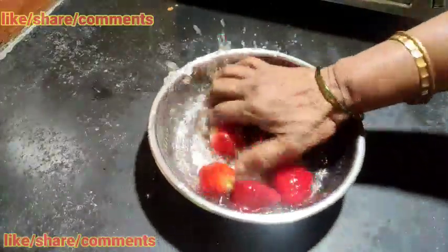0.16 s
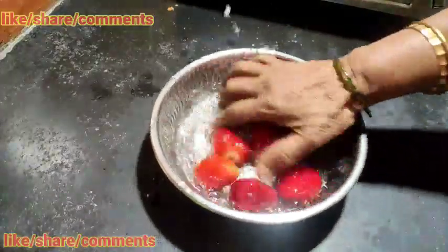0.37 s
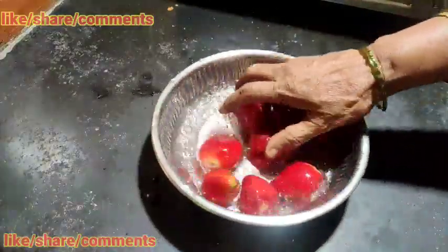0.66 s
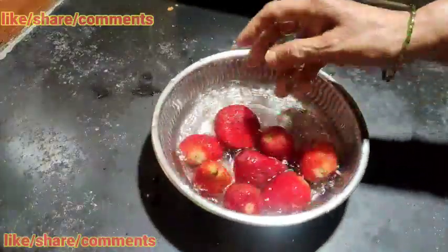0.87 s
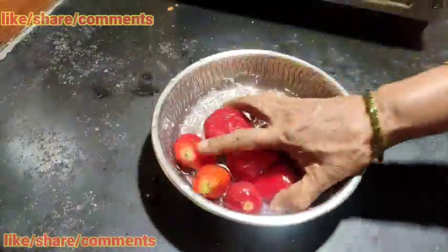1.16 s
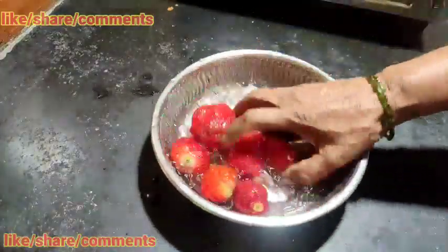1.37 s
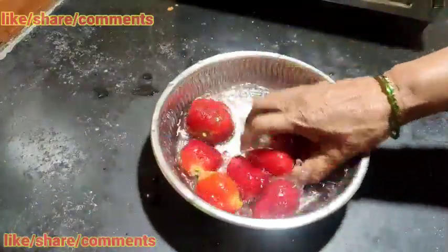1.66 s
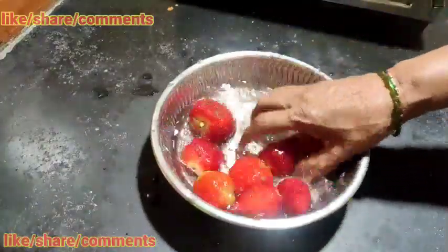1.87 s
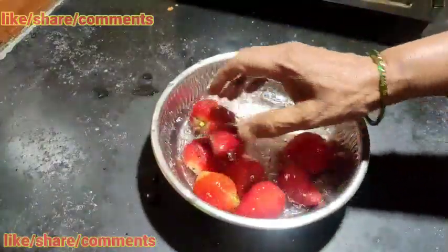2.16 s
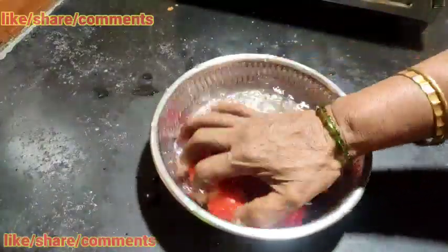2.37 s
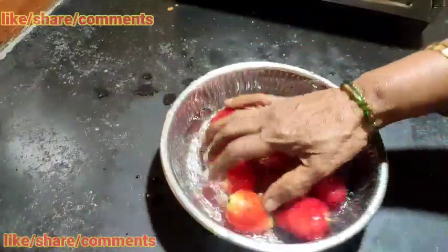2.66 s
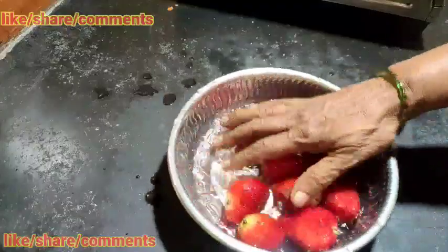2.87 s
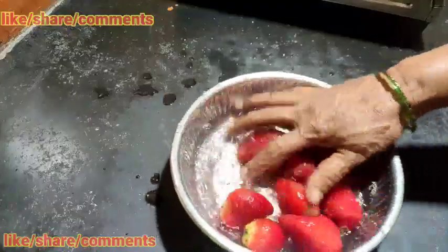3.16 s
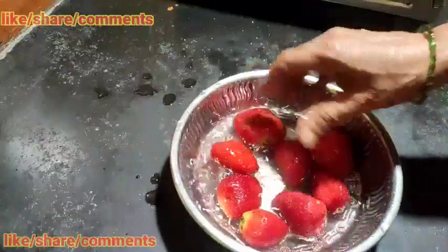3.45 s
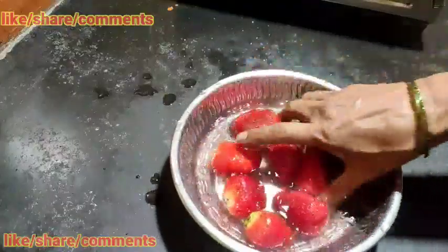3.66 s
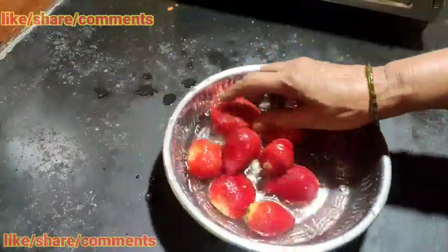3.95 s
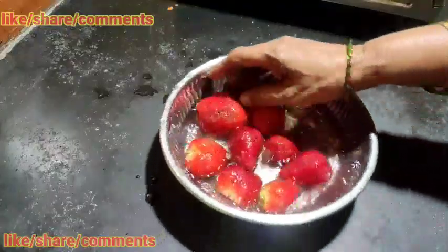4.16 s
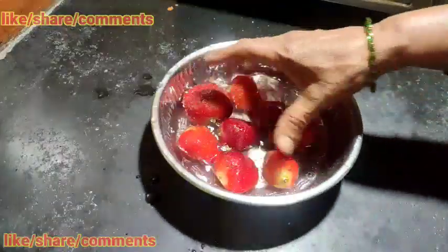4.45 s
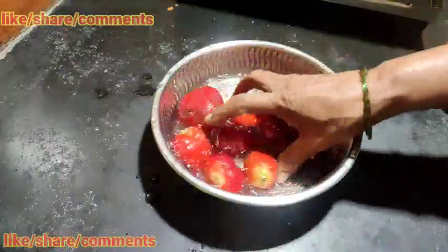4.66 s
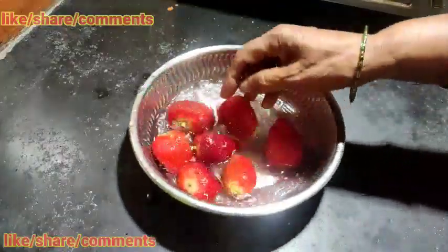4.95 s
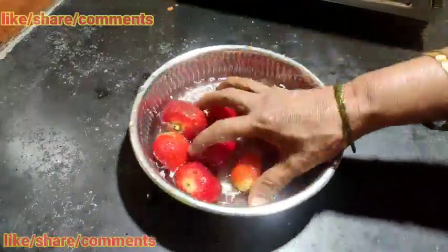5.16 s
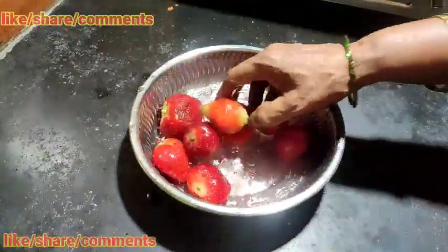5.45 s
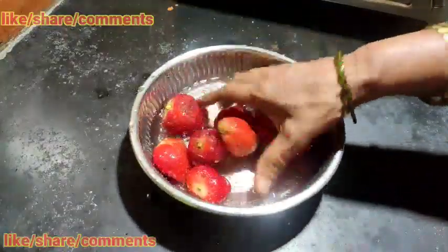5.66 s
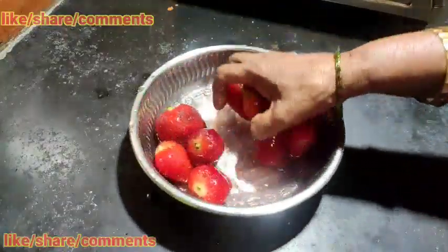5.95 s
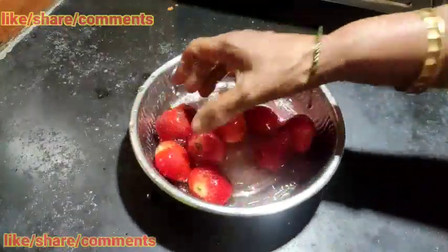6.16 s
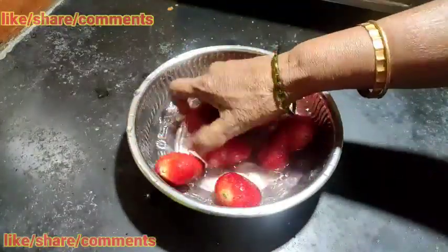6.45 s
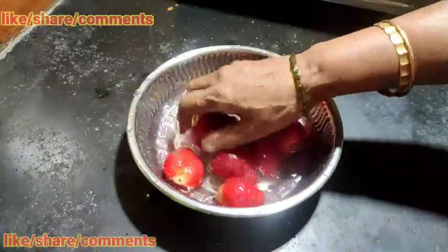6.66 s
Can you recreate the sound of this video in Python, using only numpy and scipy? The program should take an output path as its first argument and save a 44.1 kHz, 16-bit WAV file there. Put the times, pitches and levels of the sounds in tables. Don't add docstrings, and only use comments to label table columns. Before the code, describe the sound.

Fruit is stirred by hand in a thin steel bowl of water. Vigorous sloshing, bubbly plops and sharp metallic knocks come first, then a single rim ring that bends upward. Scrapes on stone, bounces, droplet ticks and tiny glass bangle clinks follow in uneven strokes, thinning toward the end. Close phone pickup from above, small reverberant kitchen, low street rumble behind.

```python
import sys
import numpy as np
from scipy import signal
from scipy.fft import rfft, irfft, next_fast_len
from scipy.io import wavfile
from scipy.ndimage import uniform_filter1d

SR = 44100
rng = np.random.default_rng(int(sys.argv[2]) if len(sys.argv) > 2 else 0)


def log_audio(samples):
    frames = np.atleast_2d(samples).T
    limited = np.clip(frames, -1, 1)
    pcm = np.round(limited * 32767).astype(np.int16)
    wavfile.write(sys.argv[1], SR, pcm)


def makeup_ratio(level_db):
    decades = np.asarray(level_db, float) / 20
    return 10 ** decades


N = 300143
TIME = np.arange(N) / SR
SIDE = np.array([[1], [-1]])


def level(x, db):
    return x * makeup_ratio(db) / np.sqrt(np.mean(x ** 2))


def colour(x, points):
    hz, db = np.transpose(points)
    size = next_fast_len(x.shape[-1])
    f = np.fft.rfftfreq(size, 1 / SR) + 1
    gain = makeup_ratio(np.interp(np.log(f), np.log(hz), db))
    return irfft(rfft(x, size) * gain, size)[..., :x.shape[-1]]


def band(x, hz, width):
    edges = np.clip([hz * 2 ** (-width / 2), hz * 2 ** (width / 2)], 10, .45 * SR)
    return signal.sosfilt(signal.butter(2, edges, "bandpass", fs=SR, output="sos"), x)


def ring(x, hz, t60):
    r, w = np.exp(-np.log(1000) / (t60 * SR)), 2 * np.pi * hz / SR
    return signal.lfilter([0, r * np.sin(w)], [1, -2 * r * np.cos(w), r * r], x)


def ports(alike, size=N):
    mid, side = rng.standard_normal((2, size))
    alike = np.clip(alike, 0, 1)
    return np.sqrt((1 + alike) / 2) * mid + np.sqrt((1 - alike) / 2) * side * SIDE


def walk(rate):
    k = int(SR / rate)
    steps = np.repeat(rng.standard_normal(N // k + 1), k)[:N]
    return level(uniform_filter1d(steps, k), 0)


def add(out, s, x):
    i = int(s * SR)
    out[:, i:i + x.shape[-1]] += x[..., :max(N - i, 0)]


def bubble(hz, cycles, rise):
    turns = np.arange(int(2 * cycles / hz * SR) + 8) * hz / SR
    tone = np.sin(2 * np.pi * turns * (1 + rise * turns / cycles / 2))
    return tone * np.exp(-3 * turns / cycles) * (1 - np.exp(-2 * turns))


# frequency in Hz, density in dB per Hz.
STREET_SPECTRUM = [(12, -18.5), (20, 9), (40, -5.5), (116, -4), (270, -10), (328, -11), (590, -20),
                   (923, -18.5), (1030, -40.5), (2140, -25.5), (4180, -33.5), (5530, -33), (10500, -45),
                   (14300, -34.5), (16000, -52)]
# frequency in Hz, width in octaves, level in dB.
TRAFFIC_DRONES = [(27, 0.58, -52.5), (73, 0.31, -55.5), (140, 0.27, -60.5)]
# middle in seconds,
# centre frequency in Hz, level in dB.
LOW_SWELLS = [(.2, 140, -44), (1.4, 73, -43.5), (1.846, 75.4, -43.5), (4.05, 142.5, -52),
              (2.85, 140, -53), (2.75, 27, -46.5), (3.405, 28.4, -43), (3.998, 29, -46.5),
              (0.249, 293, -54.5), (4.302, 63.7, -51), (4.749, 129.4, -49), (5.4, 72.8, -46),
              (5.448, 140, -53), (5.698, 27.2, -60.5), (5.98, 69.3, -50), (5.998, 131, -57),
              (6.598, 105.4, -54)]


def street():
    alike, apart = rng.standard_normal(N), ports(0.053)
    floor = colour(alike, [(200, -3.0), (1500, -18)]) + colour(apart, [(100, -22.5), (1500, -5.5)])
    out = level(colour(floor, STREET_SPECTRUM), -50.0) * makeup_ratio(1.2 * walk(4))
    for hz, width, db in TRAFFIC_DRONES:
        out = out + level(band(ports(0.88), hz, width), db)
    pass_s = 0.24
    for s, hz, db in LOW_SWELLS:
        rumble = level(band(ports(1.0, size=2 * SR), hz, 0.33), db)
        swell = np.exp(-((TIME[:2 * SR] - min(s, 1)) / pass_s) ** 2)
        add(out, max(s - 1, 0), rumble * swell)
    return out


# start in seconds, hold in seconds, sliding on stone in dB,
# stirring of the water in dB.
STROKES = [(0.0, 0.019, -32, -45), (0.123, 0.17, -39, -42), (0.268, 0.14, -41, -40), (.5, 0.25, -48, -52.5),
           (0.75, 0.0089, -57, -46), (1.167, 0.13, -45, -54.5), (1.36, 0.18, -56, -57.5),
           (1.59, 0.24, -47, -53), (1.976, 0.06, -45, -43), (2.14, 0.048, -55.5, -55),
           (2.37, 0.12, -44.5, -67.5), (2.552, 0.19, -46.5, -49.5), (2.83, 0.038, -35.5, -46.5),
           (2.966, 0.058, -42, -51.5), (3.154, 0.026, -41, -57), (3.785, 0.042, -46.5, -55.5),
           (4.158, 0.17, -40.5, -62), (4.623, 0.06, -52, -56), (4.82, 0.027, -36.5, -69),
           (5.154, 0.04, -53.5, -71), (5.267, 0.074, -42, -51.5), (5.758, 0.11, -70, -57.5),
           (6.2, 0.044, -54.5, -57), (6.31, 0.098, -46, -57), (6.5, 0.34, -60.5, -62.5)]


def hand(column, rise_s, fall_s):
    t = TIME[::64]
    rest_db = -65.5
    out = np.full(len(t), rest_db)
    for row in STROKES:
        early, late = (row[0] - t) / rise_s, (t - row[0] - row[1]) / fall_s
        out = np.maximum(out, row[column] - 10 * np.clip(np.maximum(early, late), 0, None))
    return np.interp(TIME, t, out)


def stir_db():
    return hand(column=3, rise_s=0.11, fall_s=0.079)


# frequency in Hz, density in dB per Hz.
SLIDE_SPECTRUM = [(290, -43.5), (500, -16.5), (888, -7.5), (1330, -15.5), (2200, -4), (3680, -8),
                  (5830, -0.5), (10800, -1.5), (15500, -6)]
BOWL_HZ = [930, 1590, 1770, 1960, 2170, 3010, 3780, 3930, 4680, 4800, 5450, 5680, 6600, 7755, 8420, 9030,
           10420, 11700, 12900]
# level in dB, T60 in seconds, lasting ring in dB.
BOWL_MODES = [(-20.5, 0.071, -31.5), (-21.5, 0.24, -32.5), (-16.5, 0.1, -28.5), (-15, 0.078, -28.5),
              (-21.5, 0.22, -32), (-12, 0.12, -22.5), (-13.5, 0.13, -15.5), (-6, 0.051, -18.5),
              (-10.5, 0.18, -18.5), (-7.5, 0.055, -19.5), (3, 0.035, -35), (-5.5, 0.09, -23.5),
              (-17, 0.031, -38), (1.5, 0.052, -21.5), (3, 0.015, -36), (1.5, 0.027, -28.5),
              (7.5, 0.019, -31.5), (-20.5, 0.036, -30), (-15, 0.071, -24)]


def sliding():
    crackle = makeup_ratio(-3.8 * np.log(rng.random(N) + 1e-4)) * (rng.random(N) < .03)
    rough = np.clip((stir_db() + 64) / 12, .2, 1)
    grit = ports(.1) * makeup_ratio(3.5 * rough * walk(45))
    grit = grit * (1 + 2.5 * rough * uniform_filter1d(crackle, size=13))
    modes = sum(makeup_ratio(db) * ring(grit, hz, 0.092) for hz, (db, *_) in zip(BOWL_HZ, BOWL_MODES))
    scrape = level(colour(grit, SLIDE_SPECTRUM), -0.18) + level(modes, -31.5)
    return scrape * makeup_ratio(hand(column=2, rise_s=0.053, fall_s=0.059))


def stirring(count=3000):
    out = np.zeros((2, N))
    for s, pitch, size, length, place in rng.random((count, 5)):
        grain = bubble(850 * 2 ** (2.3 * pitch), 3 + 8 * length, .3) * makeup_ratio(-4.4 * np.log(size + .03))
        pan = np.array([[np.cos(3.06 * place)], [np.sin(2.0 * place + 0.04)]])
        add(out, s * N / SR, grain * pan)
    wash = level(band(ports(.25), 1700, 2.2), -11)
    bubbles = level(out, -1)
    return (bubbles + wash) * makeup_ratio(stir_db())


# start in seconds, peak in dB, pitch in Hz, length in cycles.
PLOPS = [(0.225, -12, 1000, 6.5), (0.247, -5, 1660, 3.8), (0.313, -22.5, 830, 10.6),
         (0.03, -18.5, 1895, 38), (0.099, -15, 2400, 9.4), (0.134, -24, 1900, 7.4), (0.35, -28, 770, 5.4),
         (0.383, -31, 850, 8.4), (0.478, -31, 830, 6.4), (0.695, -21.5, 1790, 6.6), (0.714, -33, 910, 4.6),
         (0.718, -26, 2760, 8.8), (.762, -15, 2080, 8.1), (0.781, -11.5, 1950, 4.5),
         (1.685, -28, 2000, 7.6), (1.757, -23, 2600, 7.6), (1.83, -33, 2480, 5.5), (1.875, -23, 2780, 8),
         (2.02, -31, 1900, 6), (2.14, -24.5, 2100, 6.1), (2.181, -33, 1900, 5), (1.472, -35.5, 1780, 8),
         (1.501, -34, 1810, 7.4), (1.556, -31, 1780, 8), (2.116, -28, 1680, 10), (2.663, -27.5, 950, 37),
         (2.757, -30, 2600, 6), (2.9354, -14.5, 2120, 3.5), (3.067, -30, 2160, 10), (3.208, -33, 1750, 8),
         (3.302, -37, 1610, 5), (5.718, -33, 1720, 5.4), (5.918, -33, 2270, 6),
         (1.135, -33, 940, 19), (1.376, -18, 1740, 2.9), (1.598, -10, 1070, 2), (1.796, -10, 1690, 6.3),
         (1.892, -16, 1530, 4.5), (1.94, -1.5, 1940, 1.7), (1.993, -30, 1060, 9.2),
         (2.041, -17.5, 2150, 23), (2.05, -20, 1150, 12.3), (2.081, -22, 1970, 12), (2.099, -23, 1740, 7.4),
         (2.576, -38, 960, 32), (2.508, -34, 1860, 9.8), (3.34, -45, 910, 10), (3.327, -22, 1400, 10),
         (2.782, -10, 2240, 3.5), (2.999, -30.5, 1424, 34), (3.074, -26, 2020, 8.9), (3.358, -18, 2490, 12),
         (3.813, -31.5, 2040, 30), (4.812, -34.5, 730, 6.3), (5.422, -25.5, 934, 5.3),
         (5.495, -24.5, 1250, 4.3), (6.082, -37, 2270, 19), (6.681, -19, 1740, 1.6)]


def plops():
    out = np.zeros((2, N))
    for s, db, hz, cycles in PLOPS:
        place = rng.uniform(-0.65, 1)
        add(out, s, makeup_ratio(db - 5.5 + 3.2 * place * SIDE) * bubble(hz, max(cycles, 1), 0.022))
    return out


# start in seconds, peak in dB, frequency in Hz favoured by
# the spot struck, chatter in ms, ring in dB.
KNOCKS = [(0.034, -10, 7660, 11, -9.5), (0.166, 1.5, 2120, 5, -10), (0.2408, -9, 4400, 12.6, -10),
          (0.395, -3.5, 9000, 7, -9.5), (1.247, -4, 3970, 9.6, -9), (1.3066, -8.5, 3850, 2.3, -14),
          (1.961, -13, 9000, 2, -20), (2.6617, -10, 2930, 9, -12), (2.7845, -11.5, 3920, 9.2, -3),
          (3.3288, -7, 7760, 13, -6), (3.9022, -8, 5000, 0.52, -19), (4.732, -1.5, 7700, 4.6, -15),
          (4.7744, -12, 4550, 6, -13.5), (5.2256, -7.5, 4020, 19, -7.5), (5.3396, -6.5, 3740, 8.2, -9),
          (5.8115, -6.5, 3920, 2.5, -12.5)]
# start in seconds, peak in dB, favoured frequency in Hz, chatter in ms.
BOUNCES = [(0.1871, -8.5, 9000, 11.5), (0.407, -5.5, 5200, 7.4), (0.6327, -19, 5440, 12),
           (0.6556, -26, 10800, 10), (1.134, -21.5, 5840, 6.4), (1.555, -20, 8240, 6.9),
           (2.4003, -19, 5200, 4.4), (2.7516, -19, 5800, 15), (2.834, -21, 3420, 22),
           (2.796, -15.5, 5930, 7.4), (2.8467, -18, 7600, 18), (2.882, -15.5, 6200, 16),
           (3.01, -23, 7760, 10), (3.231, -18.5, 5550, 3.9), (3.241, -27, 5900, 10),
           (3.2567, -23.5, 6200, 13), (3.4005, -20.5, 5550, 6.7), (3.919, -11, 7780, 3.5),
           (5.371, -16, 7900, 4), (5.741, -38, 9070, 8), (5.932, -18, 4710, 9.9), (3.409, -43, 5800, 12)]
# frequency in Hz, density in dB per Hz.
CHATTER_SPECTRUM = [(350, -62), (600, -39.5), (878, -23.5), (1170, -21.5), (1880, -9.5), (2640, -13),
                    (3030, -9.5), (3470, -10), (3820, -5.5), (4200, -4.5), (5590, -5.5), (6230, -7),
                    (7640, -4.5), (9760, -7), (15500, -11)]


def knocks():
    out, t = np.zeros((2, N)), TIME[:8000]
    rise = 1 - np.exp(-t / 0.00063)
    bounce_ring_db, ring_least_db = -14.5, -16
    late_t60_s = .48
    for s, db, spot_hz, ms, ring_db in KNOCKS + [(*row, bounce_ring_db) for row in BOUNCES]:
        chatter = np.exp(-t * 1000 / max(ms, .3))
        rattle = makeup_ratio(-23.5) * np.exp(-t / 0.079)
        click = makeup_ratio(-5) * np.exp(-t / 0.00095)
        x = colour(ports(0.028, size=len(t)) * (chatter + rattle + click) * rise, CHATTER_SPECTRUM)
        luck = rng.standard_normal((len(BOWL_MODES), 4))
        slosh = rng.standard_normal((len(BOWL_MODES), len(t)))
        waver = level(uniform_filter1d(slosh, size=170), 0)
        for hz, (mode_db, t60, late_db), (a, b, c, d), w in zip(BOWL_HZ, BOWL_MODES, luck, waver):
            near_db = 6 * np.exp(-(np.log2(hz / spot_hz) / .1) ** 2)
            scatter_db = 2.5 * a + 2.5 * b * SIDE
            gain = makeup_ratio(max(ring_db, ring_least_db) + mode_db + near_db + scatter_db - 4.5)
            early = makeup_ratio(-60 * t / max(t60, .01)) * (1 + 0.5 * w)
            late = makeup_ratio(late_db - near_db / 2 - 60 * t / late_t60_s) * (1 + 0.99 * w)
            phase = 2 * np.pi * hz * (1 + 0.00372 * c) * t + d * SIDE * min(hz / 4000, 1.5)
            x = x + gain * (early + late) * rise * np.sin(phase)
        add(out, s - .0008, x / np.abs(x.mean(axis=0)).max() * makeup_ratio(db - 1.72))
    return out


def tick(hz, ms, bright_db):
    t = TIME[:2500]
    burst = ports(0.052, size=len(t)) * np.exp(-t * 1000 / max(ms, .2))
    x = band(burst, hz, 0.7) + makeup_ratio(bright_db) * band(burst, np.sqrt(hz * 7500), 2.28)
    return x / np.abs(x).max()


# start in seconds, peak in dB, left minus right in dB,
# centre in Hz.
SPRAY = [(0.09, -20.5, 0, 7800), (0.213, -15, 4, 7750), (0.29, -20.5, -3, 7900), (1.583, -27, 12, 11700),
         (1.6417, -26.5, -1, 7830), (1.691, -19, 2.5, 5740), (1.7373, -23.5, 6, 8040),
         (1.792, -15, 7, 12200), (1.892, -28, -1, 9800), (1.936, -18.5, 2, 7340), (2.137, -31.5, -5, 9200),
         (2.4815, -25.5, 2, 5430), (2.5473, -31, 8, 9100), (2.5696, -22, 3, 6240), (2.612, -32, -2, 11800),
         (3.009, -42, 5, 7200), (3.7512, -21, 7, 10900), (4.0105, -33, 2, 9000), (5.147, -31, 1.5, 8600),
         (5.4615, -32.5, 1.5, 8040), (5.792, -25, -4, 8100), (6.2582, -29.5, 6, 9900),
         (6.014, -38, -2.5, 11000), (6.5857, -40, -9, 8300), (6.681, -27, 4, 11560),
         (.098, -31, 3, 7040), (0.133, -26, -2.5, 10000), (.595, -39, 2.5, 7500), (1.396, -30, 0, 10900),
         (1.47, -40, 10, 11100), (1.48, -34, 2, 8000), (1.492, -40, 0, 5000), (1.521, -35, -4, 5000),
         (2.036, -18.5, 4, 11000), (2.051, -19, 1, 11000), (2.144, -34, 2, 11000), (2.184, -36, 3, 6000),
         (2.198, -41, 4, 6500), (2.214, -44, 5, 10000), (2.222, -36, 4, 13000), (2.224, -42, -3, 6000),
         (2.246, -40, -.5, 9400), (2.316, -43, -4, 7950), (2.35, -28, -1, 5430), (2.538, -33, 0, 9000),
         (2.585, -26, 2, 9000), (2.935, -25, -1, 9000), (2.992, -36, 0, 9500), (3.019, -29, 2, 4760),
         (3.144, -26, 0, 10000), (3.249, -18.5, 0, 10000), (3.408, -25, -2, 5600), (3.539, -42.5, 3, 11050),
         (3.562, -46, 6, 12000), (3.571, -49, -1, 11000), (3.622, -51, 2.5, 7000), (3.686, -32.5, 1, 13000),
         (4.941, -33.5, -4, 8800), (5.55, -40, 2, 9000), (5.648, -46, 0, 6200), (1.611, -24, -1, 5130),
         (1.755, -31, -2, 9300), (1.842, -34, 0, 9000), (1.873, -29, 2, 8800), (5.819, -26, -4.5, 9000),
         (5.877, -26, 4, 12600), (5.942, -49, 0, 8960)]


def spray():
    out = np.zeros((2, N))
    for s, db, pan_db, hz in SPRAY:
        add(out, s, makeup_ratio(db + 1.5 + pan_db * SIDE / 2) * tick(hz, ms=3.1, bright_db=-5.5))
    return out


# start in seconds, peak in dB, left minus right in dB, centre in Hz, length in
# ms.
TOUCHES = [(0.15, -10.5, 2, 6000, 1), (0.3754, -19, 5, 8640, 1.5), (3.754, -39.5, 0, 10000, 25),
           (5.741, -31.5, 4, 7600, 22), (1.498, -45, 1, 11300, 15), (6.232, -18.5, 3.5, 1800, 0.46),
           (6.232, -29, -9, 2200, 3.4), (6.305, -32, 0, 7000, 5), (6.34, -33, 0, 7000, 8),
           (6.39, -35.5, 0, 6000, 12), (6.576, -44, 3, 9060, 3), (6.778, -40, 4, 6950, 3.3),
           (5.199, -39, -11.5, 5950, 15), (6.14, -44, 0, 3030, 3.6)]


def touches():
    out = np.zeros((2, N))
    for s, db, pan_db, hz, ms in TOUCHES:
        add(out, s, makeup_ratio(db + 1.5 + pan_db * SIDE / 2) * tick(hz, ms, bright_db=-5.5))
    return out


# start in seconds, peak in dB, centre in Hz.
DROPS = [(0.228, -13, 4500), (0.691, -21.5, 4770), (1.5962, -23, 3100), (1.7079, -20.5, 3150),
         (1.732, -22, 4080), (1.779, -25, 2900), (1.817, -17.5, 4060), (1.862, -26, 2920),
         (2.0115, -24, 3400), (2.027, -18, 2670), (2.0487, -20, 2800), (2.273, -39, 3200),
         (3.005, -21, 3970), (3.66, -36, 4840), (3.6748, -38, 2960), (4.9344, -31.5, 3770),
         (6.1776, -26, 5270), (1.786, -25, 2530), (1.963, -19.5, 2300), (2.019, -25, 5700),
         (1.648, -34, 4200)]


def drops():
    out = np.zeros((2, N))
    for s, db, hz in DROPS:
        gain = makeup_ratio(db + 1.5)
        add(out, s, gain * makeup_ratio(-4) * tick(hz, ms=5, bright_db=-7.3))
        add(out, s, gain * makeup_ratio(-9) * bubble(hz, 12, 0.17))
    return out


# start in seconds, peak in dB, pitch in Hz, length in cycles.
THUMPS = [(0.408, -36, 273, 4.2), (1.057, -51, 370, 16), (1.247, -37.5, 296, 7), (1.407, -44.5, 252, 22),
          (1.671, -44.5, 280, 8), (2.398, -42, 271, 8.2), (2.781, -40.5, 260, 7), (3.009, -44, 366, 12.5),
          (3.238, -40, 382, 15), (4.852, -40.5, 252, 18.5), (4.847, -38, 520, 6.3), (4.814, -44, 335, 9.4),
          (3.356, -48.5, 447, 2.7), (5.559, -38.5, 260, 4.5), (6.196, -42.5, 254.3, 39),
          (6.229, -34, 248, 0.77)]


def thumps():
    out, t = np.zeros((2, N)), TIME[:1500]
    for s, db, hz, cycles in THUMPS:
        tap = band(ports(0.18, size=len(t)) * np.exp(-t / 0.0086), 420, 2.37)
        boom = np.convolve(bubble(hz, max(cycles, 1), 0.0194), np.hanning(40) / 20)
        add(out, s, makeup_ratio(db + 5.5) * boom * makeup_ratio(1.5 * SIDE))
        add(out, s, makeup_ratio(db + 11.5) * tap)
    return out


# start in seconds, peak in dB, T60 in seconds.
CLINKS = [
    (.655, -31, .07),
    (1.528, -41, .05),
    (1.582, -36, .06),
    (2.3343, -38, .07),
    (2.812, -34, .08),
    (3.275, -33, .14),
    (3.754, -31, .09),
    (5.743, -36, .09),
]
# frequency in Hz, level in dB.
GLASS_MODES = [(8900, -6), (10200, -12), (11300, 4), (11750, -6), (12400, -3), (13300, 1)]


def bangles():
    out, t = np.zeros((2, N)), TIME[:6000]
    for s, db, t60 in CLINKS:
        x = 0
        for (hz, mode_db), (a, b, c, d) in zip(GLASS_MODES, rng.standard_normal((len(GLASS_MODES), 4))):
            phase = 2 * np.pi * hz * (1 + 0.0039 * b) * t + 3.9 * np.array([[c], [d]])
            x = x + makeup_ratio(mode_db + 2.6 * a - 60 * t / max(t60, .01)) * np.sin(phase)
        chatter = 1 + level(uniform_filter1d(rng.standard_normal(len(t)), size=120), -4)
        add(out, s, makeup_ratio(db) * x * chatter * np.clip(t / 0.00059, 0, 1))
    return out


FLICK_S, FLICK_DB = .7402, -8.5


def shimmer(t):
    settle_s = 1.018
    db = -33 - 26 * t - 498 * np.clip(t + FLICK_S - settle_s, 0, None)
    return makeup_ratio(db) * np.clip(t / .01, 0, 1)


# frequency in Hz, strike in dB, T60 in seconds, lasting shimmer in dB,
# fractional rise while the water tilts.
RIM_MODES = [(878, -13, 0.16, -14, -0.066), (935, -4.5, 0.062, -18, 0.03), (804, -25, 0.11, -14, -0.18),
             (630, -44, 0.06, -18.5, -0.0048), (1740, -23.5, 0.082, -52.5, -0.054),
             (3320, -21, 0.13, -10.5, 0.047), (5550, -8, 0.11, -13, 0.01), (5600, -14, 0.037, -7.5, 0.17),
             (8800, -15, 0.047, -2.5, 0.13), (10000, -13, 0.037, -25, .06),
             (11570, -10.5, 0.066, -8.5, 0.0087), (12500, -10, 0.056, -6, 0.11)]


def flick():
    out, t = np.zeros((2, N)), TIME[:SR // 2]
    for hz, strike_db, t60, shimmer_db, rise in RIM_MODES:
        turns = hz * (t + rise * t ** 2 / .6)
        phase = 2 * np.pi * turns + 2.4 * rng.random((2, 1)) * min(hz / 5000, 1)
        struck = makeup_ratio(FLICK_DB + strike_db - 60 * t / t60) * (t > 0) * np.sin(phase)
        wobble = level(uniform_filter1d(ports(.4, size=len(t)), int(SR / (.045 * hz + 60)) + 1), 0)
        wobble = wobble * makeup_ratio(2.5 * walk(60)[:len(t)])
        add(out, FLICK_S, struck + shimmer(t) * makeup_ratio(shimmer_db) * wobble * np.cos(phase))
    crack = ports(0.14, size=2000) * np.exp(-TIME[:2000] / 0.0044)
    add(out, FLICK_S, makeup_ratio(-16) * band(crack, 3000, 5))
    hiss = level(band(ports(.3, size=len(t)), 10500, .9), -9)
    add(out, FLICK_S, hiss * shimmer(t))
    boom = ports(0.13, size=8000) * np.exp(-TIME[:8000] / 0.04)
    add(out, FLICK_S, makeup_ratio(-13) * band(boom, 890, 0.81))
    return out * makeup_ratio(1.2 * SIDE)


def kitchen(x, t60=0.46, t60_top=0.18, wet_db=-11):
    t, tail = TIME[:26000], ports(0.84, size=26000)
    low = signal.sosfilt(signal.butter(1, 3000, fs=SR, output="sos"), tail)
    echo = low * makeup_ratio(-60 * t / t60) + (tail - low) * makeup_ratio(-60 * t / t60_top)
    echo = echo * (t > .004)
    echo = echo / np.sqrt(np.sum(echo ** 2, axis=1, keepdims=True))
    return x + makeup_ratio(wet_db) * signal.fftconvolve(x, echo, axes=1)[:, :N]


def scene():
    struck = knocks() + spray() + touches() + drops()
    water = plops() + thumps()
    bowl = struck + 0.69 * water + stirring() + sliding() + flick() + bangles()
    return kitchen(bowl) + 0.4 * water + street()


def top_cut(x):
    return signal.sosfilt(signal.butter(12, 16660, fs=SR, output="sos"), x)


def record(dry):
    top = signal.ellip(6, .3, 30, 15600, fs=SR, output="sos")
    mix = np.clip(signal.sosfilt(top, dry), -1, 1)
    return top_cut(mix)


dry = scene()
out = record(dry)
log_audio(out)
```